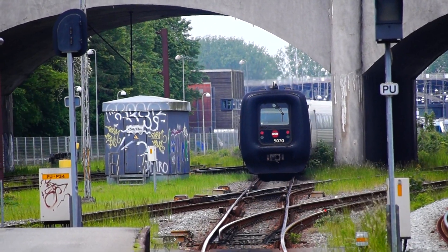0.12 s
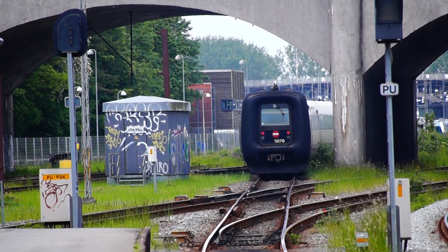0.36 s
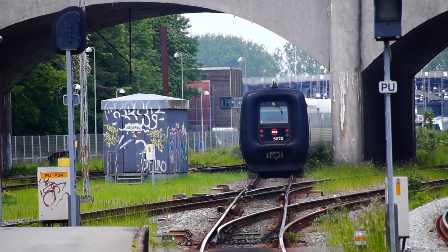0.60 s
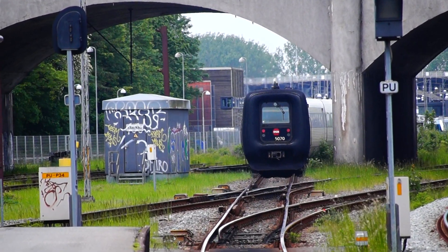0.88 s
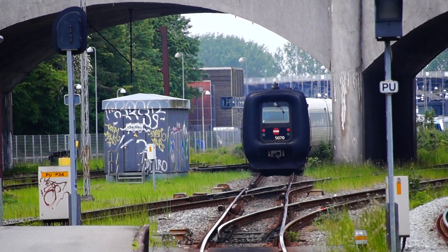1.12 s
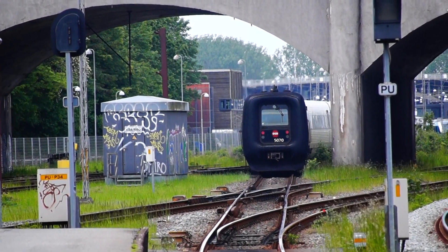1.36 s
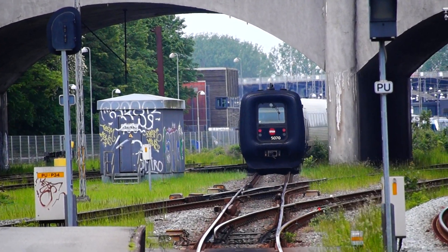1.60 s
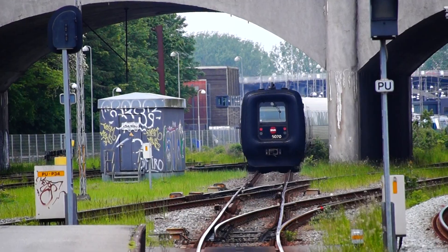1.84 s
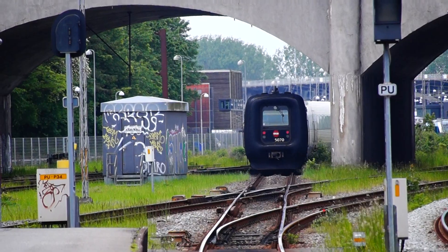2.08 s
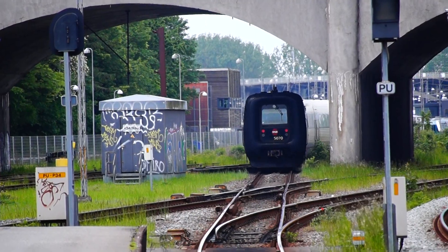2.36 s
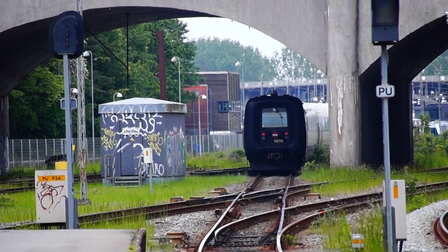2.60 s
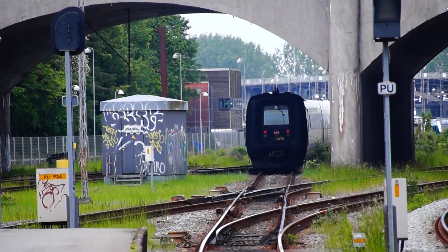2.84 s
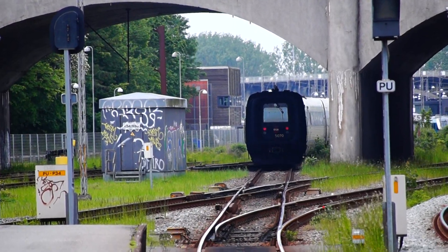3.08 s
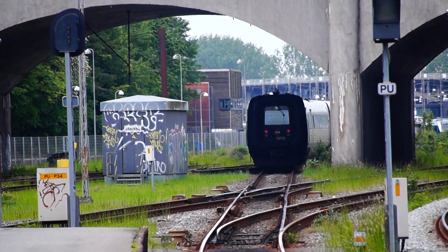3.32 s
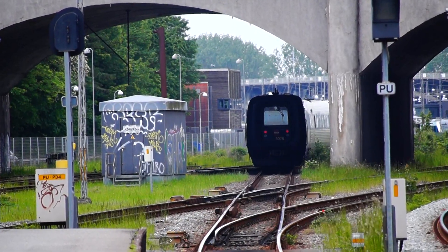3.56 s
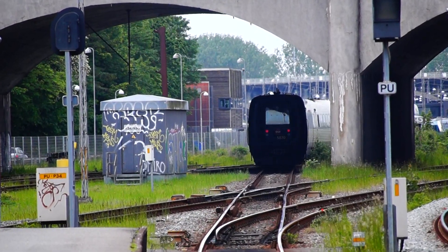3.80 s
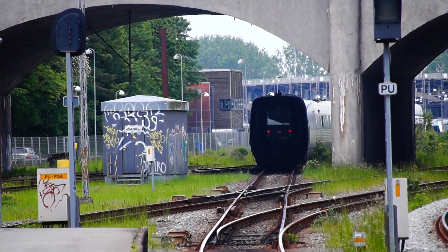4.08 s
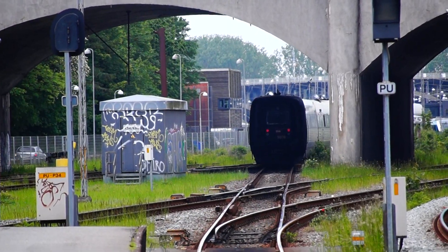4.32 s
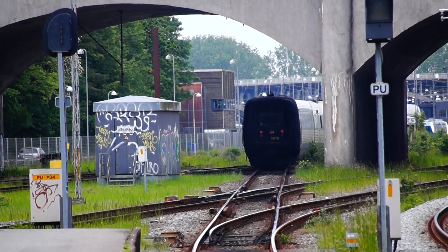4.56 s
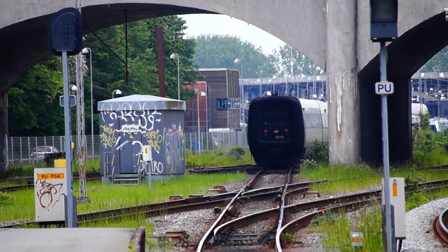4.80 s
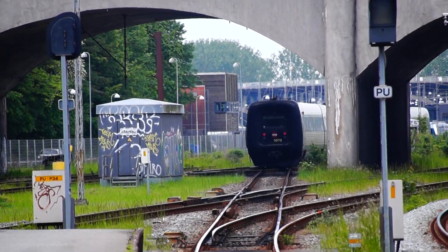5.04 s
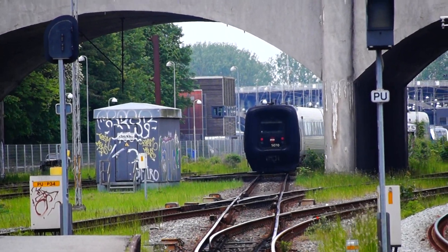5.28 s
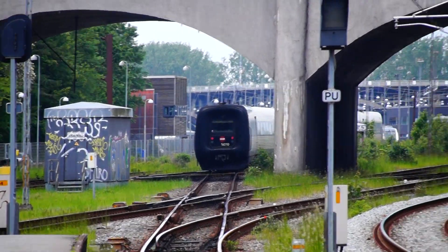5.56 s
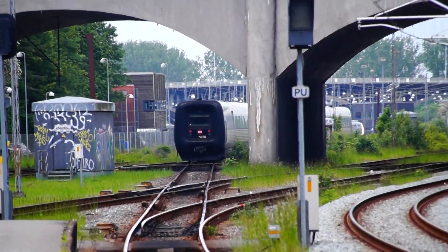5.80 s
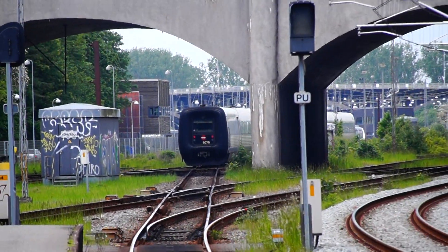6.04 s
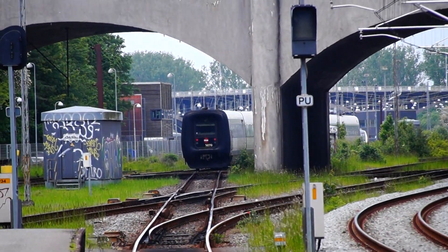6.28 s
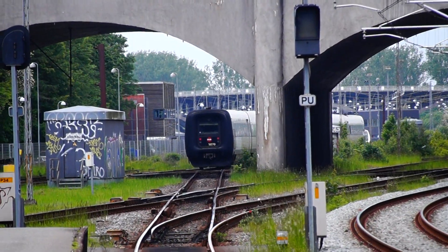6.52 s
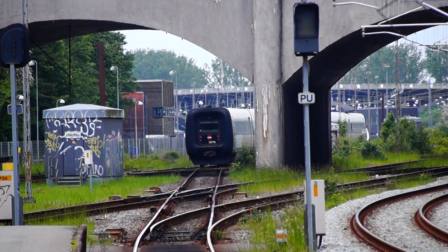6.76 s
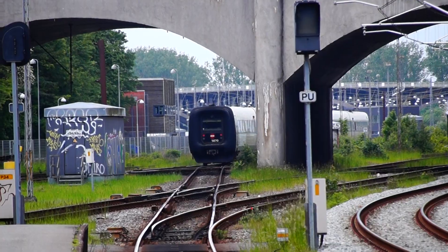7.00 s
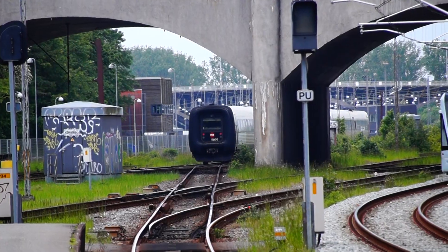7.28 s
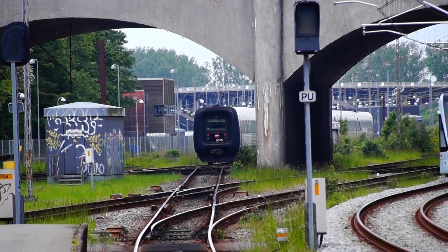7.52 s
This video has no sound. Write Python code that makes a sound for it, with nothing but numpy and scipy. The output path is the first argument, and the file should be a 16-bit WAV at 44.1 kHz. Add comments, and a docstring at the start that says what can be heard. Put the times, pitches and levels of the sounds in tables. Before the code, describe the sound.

An open trackside place, heard through a small camera's exposed stereo microphone. From 0 to 1.4 s it is fairly quiet: a soft, grey, distant roll of railcar wheels and traffic, light hiss, small low puffs of wind, and wavering bird whistles to the left. At 1.5 s wind hits with low thumps while burry whistles continue until about 2 s. The gust builds to its hardest between 2.4 and 3.1 s, with booming rumble, knocks, snaps, gritty rasps and a hollow hoot that sinks in pitch. A short lull follows, broken by a puff at 3.4 s and a snap near 4.05 s. From 4.3 s buffeting returns almost continuously, dense with thumps and crackly snaps around 5 to 6.8 s. Very faint thin wheel squeals come around 2, 6.3 and 7 s. Quick bird chirps appear at 7.4 and 7.55 s as a last heavy gust swells and cuts off.

```python
"""Wind gusts tumble over the two microphone ports of a small camera on a platform, usually left first: a
buffeting rumble of shaped eddy noise, with single thumps, snaps, whorls, rasps and a sinking hoot.
Behind it are whistled bird notes, thin rail squeals and ticks of filtered noise, and the far roll of
a railcar's wheels and traffic in swelling noise bands. The roll, the microphone hiss and the
electronic whine drop in level under hard gusts, at listed times."""
import sys
import numpy as np
from scipy import signal
from scipy.fft import rfft, irfft
from scipy.io import wavfile
from scipy.ndimage import uniform_filter1d, minimum_filter1d

SR = 44100
rng = np.random.default_rng(int(sys.argv[2]) if len(sys.argv) > 2 else 0)


def natural_amplitude(level_db):
    """Convert a level in decibels to a linear amplitude factor, elementwise."""
    exponent = np.asarray(level_db, float) / 20
    return 10 ** exponent


def dump_mix(stems):
    """Bounce the given channels to the path in sys.argv[1] as a 16-bit WAV at rate SR."""
    frames = np.atleast_2d(stems).T  # one column per channel
    limited = np.clip(frames, -1, 1)  # hard clip at full scale
    pcm = np.round(limited * 32767).astype(np.int16)
    wavfile.write(sys.argv[1], SR, pcm)


N = 336483
T = np.arange(N) / SR


def colour(x, shape):
    """Filter x by (f/Hz, relative level/dB) points, back to rms 1."""
    hz, db = np.transpose(shape)
    f = np.fft.rfftfreq(len(x), 1 / SR) + 1
    gain = natural_amplitude(np.interp(np.log(f), np.log(hz), db))
    y = irfft(rfft(x) * gain, len(x))
    return y / np.sqrt(np.mean(y ** 2))


def walk(rate):
    """Random levels held 1 / rate s and smoothed twice; spread near 1."""
    k = int(SR / rate)
    steps = np.repeat(rng.standard_normal(N // k + 1), k)
    return 1.5 * uniform_filter1d(uniform_filter1d(steps, k), k)[:N]


def curve(table):
    """Columns of (t/s, value, ..) rows, one value per sample."""
    s, *columns = np.transpose(table)
    return [np.interp(T, s, c) for c in columns]


def add(out, s, shape, pan_db, lag_s=0.):
    """Lay a short sound into both channels, the right one lag_s later; pan_db is left minus right."""
    for side, (at, db) in enumerate([(s, pan_db / 2), (s + lag_s, -pan_db / 2)]):
        i = int(at * SR)
        out[side, i:i + len(shape)] += natural_amplitude(db) * shape[:max(N - i, 0)]


def swirl(rate, spread_db):
    """Impulses at random moments, rate per second: most eddies are small and a few large."""
    happens = rng.random(N) < rate / SR
    return happens * rng.standard_normal(N) * natural_amplitude(spread_db * rng.exponential(size=N))


def eddies(shape, rate, spread_db, even):
    """A stream of eddies of one size, its chance swells over about 40 ms partly evened out (even 0-1)."""
    x = colour(swirl(rate, spread_db), shape)
    power = uniform_filter1d(uniform_filter1d(x ** 2, size=1800), size=1800)
    return x / power ** (even / 2)


def ports(make, shared, lag_s, drift_s):
    """The flow carries shared eddies past both ports with a drifting lag; each port adds its own."""
    both, shared = make(), np.clip(shared, 0, 1)
    late = np.interp(T - lag_s - drift_s * walk(6), T, both)
    own = np.array([make(), make()])
    return np.sqrt(shared) * np.array([both, late]) + np.sqrt(1 - shared) * own


def gusts():
    """Large slow eddies rumble while smaller, quicker ones follow level curves of their own."""
    # wind on the ports: (t/s, rumble/dB, eddies/dB, ripples/dB)
    gust_levels = [(0, -35, -44, -45.5), (1.47, -34.5, -41, -51.5), (1.51, -27.5, -33, -37),
                   (1.62, -26.5, -35, -40), (1.8, -24, -27, -42), (2.03, -23, -22.5, -33),
                   (2.3, -21, -23, -30.5), (2.47, -27.5, -20, -36.5), (2.545, -32, -25, -25),
                   (2.61, -25, -21.5, -21), (2.68, -23.5, -24, -23), (2.73, -25.5, -27.5, -30.5),
                   (2.76, -24, -25, -26), (2.82, -26, -27, -28.5), (2.89, -25.5, -20.5, -24.5),
                   (2.96, -20.5, -21, -22.5), (3.03, -33, -26.5, -31), (3.1, -28, -23, -29.5),
                   (3.14, -32.5, -35, -54), (3.3, -33, -35, -48), (3.4, -20, -23.5, -28.5),
                   (3.6, -26, -32, -36), (3.75, -27.5, -37.5, -42.5), (3.95, -30, -34.5, -43),
                   (4.05, -21, -26, -38), (4.18, -28, -38, -44), (4.31, -28, -27.5, -33),
                   (4.45, -32, -39.5, -46), (4.68, -24, -28.5, -33.5), (4.85, -23.5, -26.5, -32.5),
                   (5.0, -21.5, -24, -32), (5.12, -26, -22, -24.5), (5.18, -22.5, -25.5, -34),
                   (5.24, -28, -22, -32.5), (5.3, -26, -31.5, -31), (5.5, -20.5, -24.5, -30.5),
                   (5.75, -25.5, -34.5, -40.5), (6.02, -25, -26, -30.5), (6.25, -25, -25, -33.5),
                   (6.45, -25, -23.5, -31), (6.68, -25, -24, -26), (6.85, -25, -21, -34),
                   (7.03, -18, -20.5, -29.5), (7.15, -25, -28.5, -36), (7.33, -24.5, -27, -38),
                   (7.5, -22, -26, -32), (7.63, -18, -14, -28)]
    # brief puffs (up) and lulls (down) of the flow: (centre t/s, level/dB, length/s)
    surges = [(0.094, 10, 0.08), (0.37, 8, 0.13), (0.522, 7.5, 0.051), (0.717, 8.5, 0.05),
              (0.855, 9, 0.032), (0.94, 3.5, 0.068), (1.097, 4.5, 0.054), (1.205, 5.5, 0.046),
              (1.308, 7.5, 0.04), (1.62, -4, 0.072), (2.189, -14.5, 0.026), (2.316, -3, 0.026),
              (2.392, -18, 0.046), (2.527, -7.5, 0.044), (3.514, -9, 0.058), (3.792, -5.5, 0.054),
              (3.204, -1.5, 0.046), (3.839, 8.5, 0.035), (4.048, 4, 0.036), (4.215, -5.5, 0.038),
              (4.436, -10, 0.043), (4.492, -10, 0.062), (4.62, -8.5, 0.051), (4.7, -2, 0.031),
              (4.808, -5, 0.032), (4.992, 3, .05), (5.31, -8, 0.061), (5.445, -11, 0.034),
              (5.541, -6, 0.048), (5.615, -10, 0.084), (5.747, -6.5, 0.046), (5.804, -3.5, .04),
              (5.922, 2, 0.024), (5.945, -9, 0.026), (6.058, 5.5, 0.056), (6.33, -4, 0.047),
              (6.513, -7, 0.04), (6.687, 4, 0.048), (6.817, -9, 0.028), (7.083, -11.5, 0.06),
              (7.388, 4, 0.019), (7.442, -3.5, 0.028), (7.517, 2, 0.056)]
    # spectra of large, middle and small eddies: (f/Hz, relative level/dB)
    rumble = [(12, -49.5), (20, -12), (38, -7.5), (70, -1), (125, 1.5), (170, -4), (240, -14), (500, -72.5),
              (3000, -150)]
    middling = [(80, -33.5), (150, -2.5), (230, 1.5), (330, -3.5), (500, -20), (900, -46.5), (5000, -140)]
    ripples = [(150, -50.5), (300, -11.5), (420, -4.5), (560, -12), (750, -21), (1200, -31), (2000, -40.5),
               (5000, -78.5), (16000, -120)]
    gusty_db, sway_db = 1.05, 2  # chance spread of the wind level and of left minus right

    rumble_db, eddy_db, ripple_db = curve(gust_levels)
    surge_db = gusty_db * walk(14)
    for s, db, length in surges:
        surge_db = surge_db + db * np.exp(-(2 * (T - s) / length) ** 4)
    pan_db = sway_db * walk(20)
    big = ports(lambda: eddies(rumble, rate=900., spread_db=2.5, even=0.53),
                shared=0.83, lag_s=0.0003, drift_s=0.00049)
    mid = ports(lambda: eddies(middling, rate=900., spread_db=3.0, even=0.67),
                shared=0.67, lag_s=0.00062, drift_s=0.00041)
    fine = ports(lambda: eddies(ripples, rate=1200., spread_db=4.0, even=0.55),
                 shared=0.45, lag_s=0.00065, drift_s=0.00034)
    flutter = natural_amplitude(1.8 * walk(35))
    mid = mid * natural_amplitude(eddy_db + 1.43 * walk(18))
    fine = fine * natural_amplitude(ripple_db + 1.67 * walk(18))
    out = big * natural_amplitude(rumble_db) + (mid + fine) * flutter
    return out * natural_amplitude(surge_db + np.array([pan_db, -pan_db]) / 2)


def buffets():
    """Single strong eddies thump: 2.62 cycles of a tone steepened by overtones, in a smooth swell."""
    # thumps: (t/s, level/dB, f/Hz, left minus right/dB)
    thumps = [(0.695, -19, 148, -1), (0.942, -20, 130, 2), (1.517, -10.5, 131, -1), (1.572, -12, 206, -1),
              (2.028, -11, 172, -3), (2.075, -11.5, 141, 2), (2.125, -11.5, 170, -1), (2.21, -11, 145, 2),
              (2.432, -16, 148, -3), (2.477, -11.5, 181, -14), (2.537, -11, 403, 0), (2.591, -7, 366, -5),
              (2.702, -14, 304, -4), (2.783, -10.5, 210, 0), (2.804, -15, 199, -3), (2.828, -11.5, 191, -2),
              (2.857, -8, 218, 0), (2.899, -7.5, 233, 2), (2.947, -11, 286.8, 4), (3.081, -14, 252.6, -3),
              (3.664, -24, 139, 2), (3.82, -18.5, 109, 6), (4.255, -17.5, 116, -2), (4.3, -15, 136, -7),
              (4.336, -19, 218, 10), (4.377, -19, 170, 0), (4.444, -22, 125, 2), (4.551, -13.5, 176.4, 5),
              (4.648, -17.5, 135.4, 5), (4.685, -11, 140.5, 2), (4.74, -21, 187, 4), (4.843, -11, 210, -4),
              (4.928, -10.5, 141, -2), (4.955, -22, 124, -8), (4.972, -13.5, 168, 1), (4.994, -15, 193, -3),
              (5.045, -17, 232, 1), (5.088, -14.5, 220, -3), (5.227, -10, 192, -2), (5.346, -16.5, 161, -1),
              (5.412, -11, 250, 0), (5.479, -10.5, 200, 0), (5.568, -12, 182, 8), (5.62, -21, 120, 0),
              (5.657, -12.5, 160, 2), (5.682, -16.5, 149, -2), (5.864, -14.5, 162, 3),
              (5.916, -14.5, 100, 5), (6.034, -11.5, 108, -5), (6.144, -11, 199, 2), (6.236, -11, 291, 1),
              (6.283, -14, 190, 3), (6.381, -13, 300, -1), (6.403, -14, 280, 0), (6.459, -13, 160, -4),
              (6.531, -13.5, 111, -6), (6.566, -14, 300, -3), (6.584, -11.5, 200, 2), (6.663, -12, 137, 3),
              (6.714, -12.5, 201, -2), (6.732, -10, 300, 2), (6.878, -15.5, 312, 0), (7.114, -11, 212, -5),
              (7.185, -10, 251, 0.5), (7.449, -11, 129, 5), (7.494, -8, 128, 1)]
    steep = 0.29  # second harmonic against the fundamental; the third has its square
    out = np.zeros((2, N))
    for s, db, hz, pan in thumps:
        t = np.arange(int(2.62 / hz * SR)) * hz / SR  # in cycles
        swing = np.sin(2 * np.pi * t) + steep * np.sin(4 * np.pi * t) + steep ** 2 * np.sin(6 * np.pi * t)
        swell = np.sin(np.pi * t / t[-1]) ** 2
        add(out, s, natural_amplitude(db) * swell * swing, pan, lag_s=0.00059)
    return out


def snaps():
    """Sharp pressure snaps: a quickly damped tone with an inharmonic partner."""
    # snaps: (t/s, level/dB, left minus right/dB)
    strikes = [(1.959, -11.5, -4), (2.592, -24, -14), (2.748, -21.5, -13.5), (2.953, -7, -1),
               (4.056, -13.5, -5), (4.842, -13.5, -2), (5.489, -10, 5.5), (5.663, -18, 12), (6.168, -18, 0),
               (6.239, -8, -4), (6.366, -26, -2), (6.382, -15, -1), (6.405, -15, -1), (6.475, -14.5, -7),
               (6.565, -13, -6), (6.66, -11, 5), (6.697, -11, -1), (6.725, -13, 8), (6.766, -17, -6),
               (7.002, -12, -2), (7.121, -18, 12), (7.27, -17, 7), (7.413, -14, 1), (7.45, -16, -5),
               (7.606, -9, -6)]
    snap_hz = 567
    t = np.arange(int(6 / snap_hz * SR)) * snap_hz / SR  # in cycles
    ring = np.sin(2 * np.pi * t) + 0.33 * np.sin(2 * np.pi * 1.57 * t)
    shape = 2 * t * np.exp(1 - t / 0.4) * ring
    out = np.zeros((2, N))
    for s, db, pan in strikes:
        add(out, s, natural_amplitude(db) * shape, pan, lag_s=0.00051)
    return out


def hoot():
    """Narrow noise follows the size of the shed eddies and sinks unevenly, partly alike at the ports."""
    # crest of the hardest gust: (t/s, f/Hz, level/dB)
    track = [(2.515, 400, -45), (2.535, 430.3, -29), (2.56, 449.6, -20), (2.6, 390, -20.5),
             (2.64, 339.6, -21), (2.69, 249.6, -20), (2.76, 200, -23.5), (2.84, 200, -25.5),
             (2.875, 230.2, -17.5), (2.91, 210.7, -17), (2.94, 260.3, -25), (2.98, 219.9, -19),
             (3.01, 249.6, -29), (3.06, 299.4, -25), (3.105, 280, -24.5), (3.125, 250, -55)]
    width_hz = 130
    hz, db = curve(track)
    low = signal.butter(2, width_hz / 2, fs=SR, output="sos")
    noise = rng.standard_normal((3, N)) + 1j * rng.standard_normal((3, N))
    slow = signal.sosfilt(low, noise)
    slow = (slow[:2] + 0.93 * slow[2]) * natural_amplitude(2.5 * walk(30.01))
    slow = slow / np.std(slow)
    on = (T > track[0][0]) * (T < track[-1][0])
    carrier = np.exp(2j * np.pi * np.cumsum(hz) / SR)  # shifts the slow noise up to the pitch
    return np.sqrt(2) * natural_amplitude(db) * on * np.real(slow * carrier)


def whorls():
    """Small fast whorls shed at the crests of gusts: ragged noise bursts, partly alike at the two ports."""
    # bursts: (start t/s, level/dB, f/Hz, length/s)
    bursts = [(1.775, -31, 674, 0.026), (1.956, -29, 665, 0.033), (2.132, -22, 533, 0.032),
              (2.543, -26, 482, 0.03), (2.592, -21, 506, 0.029), (2.64, -15, 520, 0.03),
              (2.654, -25, 880, 0.039), (2.789, -29, 750, 0.03), (2.96, -26, 880, 0.04),
              (4.985, -27, 700, 0.025), (5.13, -28, 750, 0.035), (2.697, -24, 507, 0.029),
              (2.746, -26, 493, 0.027), (2.807, -23, 528, 0.034), (2.876, -23, 490, 0.029),
              (2.953, -16.5, 534, 0.028), (3.04, -33, 482, 0.028), (3.385, -24, 550, 0.028),
              (4.055, -27, 500, 0.03), (4.303, -29, 498, 0.036), (4.335, -32, 649, 0.025),
              (4.557, -21.5, 845, 0.03), (4.845, -25, 495, 0.027), (4.973, -23, 570, 0.03),
              (5.035, -28, 520, 0.027), (5.117, -21, 546, 0.036), (5.489, -18.5, 503, 0.031),
              (5.57, -42, 606, 0.034), (5.663, -29, 630, 0.03), (6.041, -26, 482, 0.03),
              (6.168, -28, 482, 0.03), (6.24, -15, 560, 0.018), (6.367, -26, 546, 0.03),
              (6.403, -23.5, 560, 0.019), (6.471, -19, 650, 0.015), (6.54, -26, 482, 0.03),
              (6.661, -19, 490, 0.027), (6.701, -25, 581, 0.032), (6.76, -24, 750, 0.019),
              (6.864, -31, 493, 0.03), (7.004, -22, 487, 0.035), (7.121, -25, 514, 0.027),
              (7.192, -28, 589, 0.027), (7.272, -30, 610, 0.03), (7.308, -25, 487, 0.028),
              (7.414, -24, 528, 0.03), (7.45, -21, 482, 0.031), (7.539, -31, 611, 0.03),
              (7.608, -17, 506, 0.032)]
    out = np.zeros((2, N))
    for s, db, hz, length in bursts:
        i, n = int(s * SR), int(np.clip(length, .01, .08) * SR)
        band = signal.butter(1, [hz / 1.29, hz * 1.35], "bandpass", fs=SR, output="sos")
        noise = rng.standard_normal((3, 5000))
        partly_alike = noise[:2] + 0.8 * noise[2]
        burst = signal.sosfilt(band, signal.sosfilt(band, partly_alike))[:, -n:]
        swell = np.sin(np.pi * np.linspace(0, 1, n) ** 0.5) ** 2
        piece = natural_amplitude(db) * burst / (3 * burst.std()) * swell
        out[:, i:i + n] += piece[:, :N - i]
    return out


def rasps():
    """Air tears at the port edge: short gritty hisses around one pitch, unrelated at the two ports."""
    # hisses: (start t/s, level/dB, length/s)
    tears = [(2.041, -41, .05), (2.438, -34, 0.046), (2.607, -38, 0.07), (2.656, -36, .06),
             (2.729, -39, .05), (2.939, -42, 0.048), (5.344, -35, 0.057), (5.825, -33.5, 0.055),
             (5.968, -31, 0.054), (6.022, -31.5, 0.044), (6.11, -37, .06), (6.371, -36, .04),
             (6.421, -33, .06), (6.642, -32, 0.11), (6.811, -34, 0.048), (7.169, -35.5, 0.046)]
    rasp_hz = 1940
    out = np.zeros((2, N))
    band = signal.butter(2, [rasp_hz / 1.25, rasp_hz * 1.48], "bandpass", fs=SR, output="sos")
    for s, db, length in tears:
        i, n = int(s * SR), int(np.clip(length, .01, .16) * SR)
        grit = rng.standard_normal((2, 8000)) * natural_amplitude(1.5 * rng.exponential(size=(2, 8000)))
        out[:, i:i + n] += signal.sosfilt(band, grit)[:, -n:] * np.hanning(n) * natural_amplitude(db)
    return out


def wind():
    """All that the flow does at the ports: steady tumbling and single events."""
    return gusts() + buffets() + snaps() + hoot() + whorls() + rasps()


def birds():
    """Wavering whistles from the left, with a burr from an uneven throat flutter and a diffuse echo tail."""
    # notes: (start t/s, length/s, first f/Hz, middle f/Hz, last f/Hz, level/dB, burr 0-1)
    notes = [(.372, .085, 2300, 2040, 1900, -48, .6), (.43, .115, 1900, 1970, 2650, -50, .65),
             (.44, .045, 3720, 3700, 3820, -55, .45), (.56, .065, 2950, 2910, 2900, -54, .55),
             (.797, .02, 4250, 4300, 4350, -63, .1), (.822, .034, 5350, 4950, 4350, -60, .3),
             (.993, .032, 5600, 5200, 4400, -63.5, .35), (1.188, .045, 4300, 4400, 4700, -58, .4),
             (1.345, .05, 2100, 2070, 2020, -44, .1), (1.66, .06, 2830, 2720, 2500, -49, .35),
             (1.695, .11, 2600, 2490, 2570, -43, .6), (1.77, .15, 2520, 2490, 2550, -53, .7),
             (1.9, .04, 3000, 3060, 3120, -55, .3), (1.85, .055, 5350, 4970, 4960, -59, .2),
             (1.9, .06, 4970, 4980, 5000, -62, .3), (2.005, .05, 4950, 4980, 5000, -66, .3),
             (2.04, .035, 8000, 7750, 7500, -70, .3), (2.225, .025, 5800, 5500, 4700, -67, .3),
             (2.285, .035, 5700, 6050, 5300, -68.5, .4), (2.92, .07, 4600, 4250, 3980, -64, .2),
             (3.155, .05, 5090, 4600, 3820, -64, .2), (7.377, .024, 3250, 3850, 4950, -58, .15),
             (7.398, .022, 4900, 5000, 4050, -59.5, .15), (7.543, .024, 3400, 3950, 5000, -54.5, .15),
             (7.572, .022, 4300, 3650, 3050, -56, .15), (7.605, .015, 3300, 3800, 4590, -60, .15)]
    turn = .3  # share of a note's length at which it reaches its middle pitch
    whistles, waver = np.zeros(N), 1 + .008 * walk(90)
    flutter_hz = 190 * (1 + .12 * walk(40))
    flutter = np.sin(2 * np.pi * np.cumsum(flutter_hz) / SR)
    breaks = walk(70)
    for s, length, first, middle, last, db, burr in notes:
        u = np.clip((T - s) / length, 0, 1)
        glide = np.interp(u, [0, turn, 1], [first, middle, last])
        hz = uniform_filter1d(glide, size=300) * waver
        tone = np.sin(2 * np.pi * np.cumsum(hz) / SR)
        voice = (1 + burr * flutter) * natural_amplitude(db + 4 * burr * breaks) * tone
        whistles += np.sqrt(2 * np.abs(np.sin(np.pi * u ** .8))) * voice
    n = int(.25 * SR)
    echo = rng.standard_normal((2, n)) * np.exp(-np.arange(n) / SR / 0.13)
    tail = np.array([signal.fftconvolve(whistles, e)[:N] for e in echo])
    return whistles * natural_amplitude(np.array([[2.5], [-3.5]])) + natural_amplitude(-38.5) * tail


def squeals():
    """Wheel flanges sing: grainy, broken noise in a narrow wheel resonance."""
    # squeals: (start t/s, end t/s, f/Hz, distance to the -16 dB points/Hz, level/dB)
    songs = [(1.45, 1.75, 6800, 90, -71), (1.75, 1.9, 4300, 700, -62), (1.93, 2.33, 4500, 500, -67),
             (2.36, 2.6, 4500, 550, -65), (6.1, 6.2, 4750, 350, -68), (6.22, 6.34, 4650, 350, -65.5),
             (6.34, 6.46, 4500, 350, -68), (6.52, 6.62, 3750, 800, -65), (6.87, 7.12, 3750, 800, -63.5),
             (7.12, 7.33, 3650, 700, -66)]
    out = np.zeros((2, N))
    for start, end, hz, width_hz, db in songs:
        on = np.clip(np.minimum(T - start, end - T) / 0.037, 0, 1)
        resonance = [(hz - 2 * width_hz, -45), (hz - width_hz, -16), (hz, 0),
                     (hz + width_hz, -16), (hz + 2 * width_hz, -45)]
        ring = colour(rng.standard_normal(N), resonance)
        out += on * natural_amplitude(db + 1.2 * walk(25) + 2 * walk(110)) * ring
    return out


def ticks():
    """Dry ticks and short coloured scrapes near the camera: windowed noise around one pitch."""
    # ticks: (start t/s, level/dB, f/Hz, distance to the band's lower -20 and upper -18 dB points/Hz, length/s)
    cracks = [(2.615, -50, 3300, 1400, .004), (2.632, -47, 2900, 1500, .005),
              (2.677, -42, 3500, 1700, .005), (5.355, -43, 3400, 1400, .016),
              (5.355, -42, 2000, 1100, .014), (6.02, -47, 3300, 1000, .032), (6.189, -60, 7500, 4500, .004),
              (6.197, -50, 7200, 5500, .005), (6.197, -64, 13500, 4000, .004),
              (6.381, -41, 2700, 1500, .006), (6.404, -44, 3500, 3000, .003), (6.648, -41, 2300, 700, .045),
              (6.655, -48, 4000, 3000, .045), (6.652, -43, 2300, 1500, .01), (6.725, -46, 2500, 2400, .004),
              (7.602, -45, 2350, 800, .025)]
    out = np.zeros((2, N))
    for s, db, hz, width_hz, length in cracks:
        band = [(hz - width_hz, -20), (hz, 0), (hz + width_hz, -18), (2 * hz + width_hz, -60)]
        crack = colour(rng.standard_normal(4096), band)
        n = int(length * SR)
        add(out, s, natural_amplitude(db) * crack[:n] * np.hanning(n), 0)
    return out


def dips():
    """Background level in dB: each step comes at once, its quick and lasting parts decay separately."""
    # drops under hard gusts, positive parts lift: (t/s, quick level/dB, lasting level/dB)
    drops = [(1.56, -5.5, 0), (2.075, 0.5, -4.5), (2.36, -8, 2), (2.5, 2, -5), (2.608, -7.5, 1),
             (2.81, -10, -1), (2.975, -3.5, -3), (4.7, -6.5, -0.2), (5.05, -7.5, -1.5), (5.43, -2, -1.5),
             (6.055, -2.5, -2.5), (6.148, -6, 0), (6.401, 0, -1.7), (6.476, -4, -2.5), (6.61, -1.5, 2),
             (6.735, -5.5, -0.3), (7.0, 3, -4.5), (7.2, -4, -0.2), (7.58, -4, 2.5)]
    quick_s, lasting_s = 0.036, 1.23  # recovery times
    db = np.zeros(N)
    for s, quick, lasting in drops:
        since = np.maximum(T - s, 0)
        db += (T > s) * (quick * np.exp(-since / quick_s) + lasting * np.exp(-since / lasting_s))
    return uniform_filter1d(db, size=700)


def far(dip_db):
    """Wheels and traffic: half-octave noise bands swell together and flicker alone; left is a little nearer."""
    # overall tilt laid over the bands: (f/Hz, relative level/dB)
    spectrum = [(120, -34.5), (200, -6), (231, -3), (349, -10), (410, -10.5), (537, -13), (600, -9),
                (693, -8.5), (950, -7.5), (1320, -6.5), (1450, -11), (1800, -14), (2100, -17), (2520, -21),
                (3000, -22.5), (6240, -38.5), (9000, -48.5), (11700, -58.5), (19800, -120)]
    # likeness of the channels: (f/Hz, likeness 0-1)
    likeness = [(300, 0.5), (700, 0.88), (1400, 0.52), (3100, 0.53), (6800, 0)]
    roll_db, roll_share = -35.5, 0.89  # undisturbed level; share of each dip felt by the roll
    like_hz, like = np.transpose(likeness)
    out, swell = 0, walk(3.35)
    for hz in 200 * 2 ** np.arange(0, 5.6, .5):
        band = [(hz / 2, -40), (hz / 1.41, -9), (hz / 1.19, -3), (hz, 0),
                (hz * 1.19, -3), (hz * 1.41, -9), (hz * 2, -40)]
        alike = np.clip(np.interp(np.log(hz), np.log(like_hz), like), 0, 1)
        mid, side = (colour(rng.standard_normal(N), band) for _ in range(2))
        pair = np.sqrt(1 + alike) * mid + np.sqrt(1 - alike) * side * np.array([[1], [-1]])
        out = out + np.sqrt(hz) * natural_amplitude(0.92 * swell + 0.81 * walk(9) + 0.74 * walk(45)) * pair
    tilted = np.array([colour(channel, spectrum) for channel in out])
    return tilted * natural_amplitude(roll_db + roll_share * dip_db + np.array([[.7], [-.7]]))


def hiss():
    """Microphone hiss: independent coloured noise in each channel, slightly widened."""
    # hiss spectrum: (f/Hz, relative level/dB)
    spectrum = [(500, 2.5), (6000, -3.5), (15000, -5)]
    left, right = (colour(rng.standard_normal(N), spectrum) for _ in range(2))
    # the stereo widener subtracts a little of each side from the other
    return np.array([left - 0.056 * right, right - 0.064 * left])


def whine():
    """Camera electronics: steady high sines, alike in both channels."""
    # whines: (f/Hz, level against the hiss/dB)
    tones = [(14050, -34), (14075, -31), (15625, -32)]
    return sum(natural_amplitude(db) * np.sin(2 * np.pi * hz * T) for hz, db in tones)


def scene():
    """Wind in front; the far roll, the hiss and the whine sink under gusts; the last 4 ms fade out."""
    dip_db = dips()
    noise_floor = natural_amplitude(-56.5 + dip_db) * (hiss() + whine())
    mix = wind() + birds() + squeals() + ticks() + far(dip_db) + noise_floor
    return mix * np.clip((T[-1] - T) / .004, 0, 1)


def roll_off(x):
    """The treble ends steeply here."""
    return signal.sosfilt(signal.butter(12, 16030, fs=SR, output="sos"), x)


def record(dry):
    """A linked limiter leans on the largest swings, held over a 15 ms window; then the top is cut."""
    limit_db, top_hz = -6, 15800
    peak = np.abs(dry).max(axis=0) + 1e-9
    room = np.minimum(natural_amplitude(limit_db) / peak, 1) ** .7  # partial limiting
    gain = uniform_filter1d(minimum_filter1d(room, size=660), size=440)
    top = signal.ellip(10, .2, 70, top_hz, fs=SR, output="sos")
    return roll_off(signal.sosfilt(top, dry * gain))


dry = scene()
out = record(dry)
dump_mix(out)
```